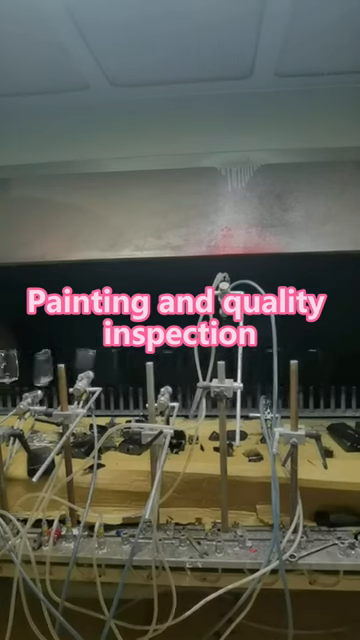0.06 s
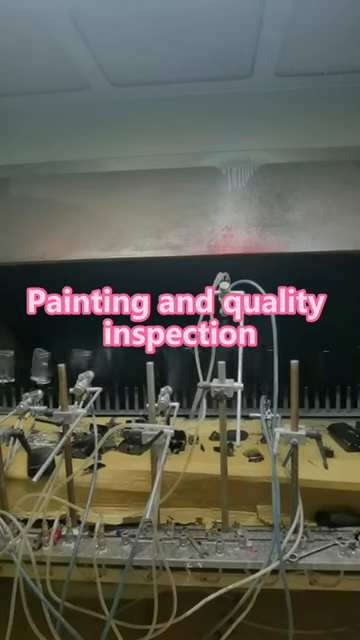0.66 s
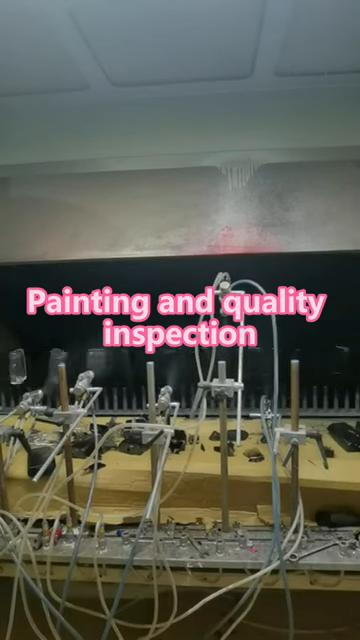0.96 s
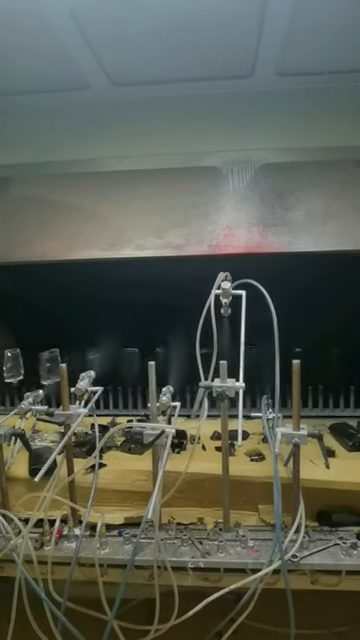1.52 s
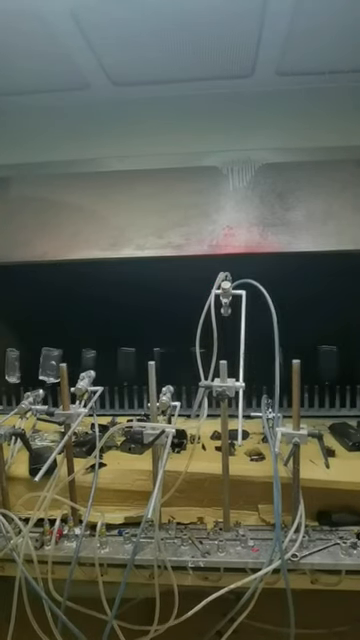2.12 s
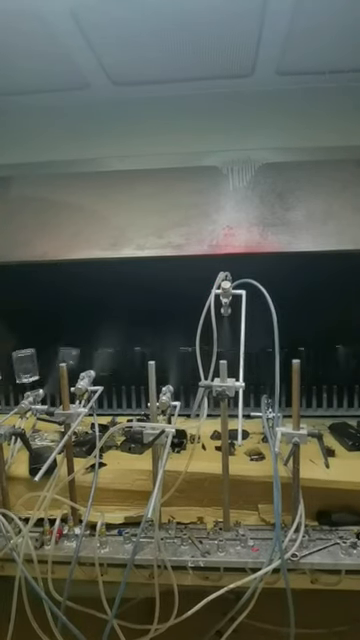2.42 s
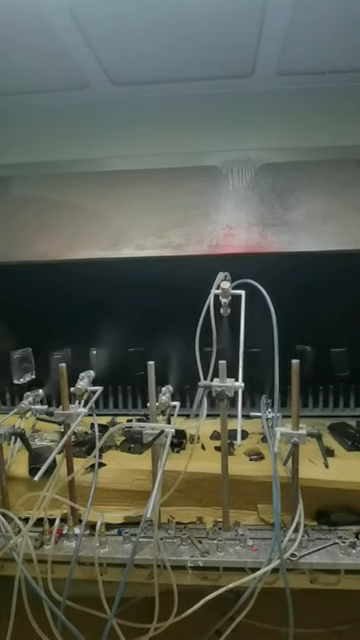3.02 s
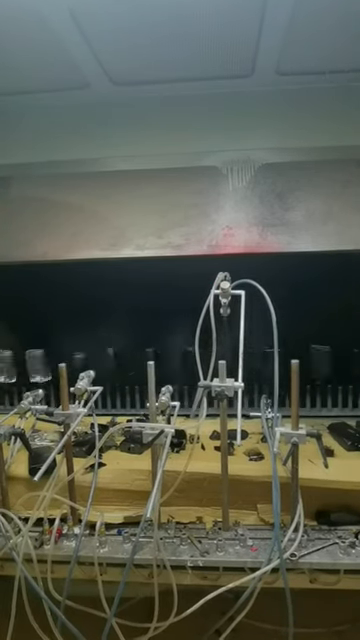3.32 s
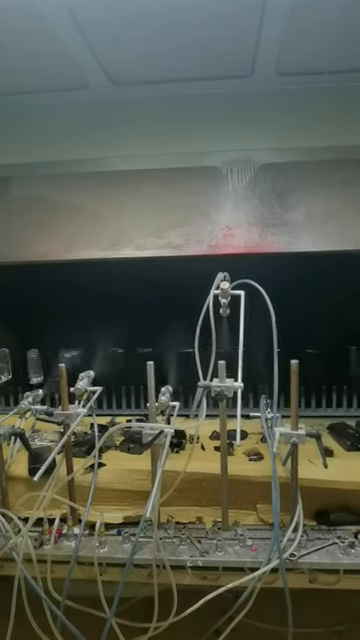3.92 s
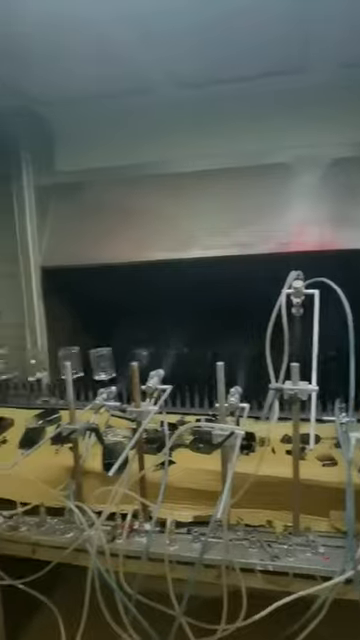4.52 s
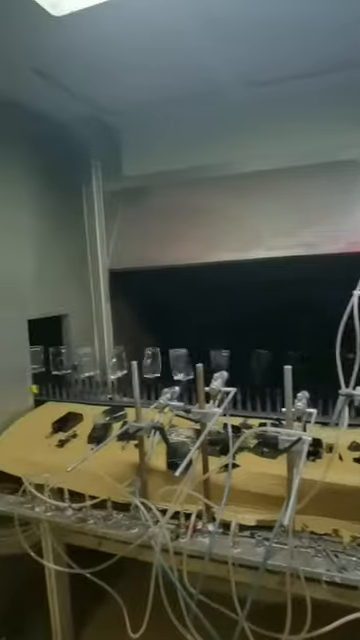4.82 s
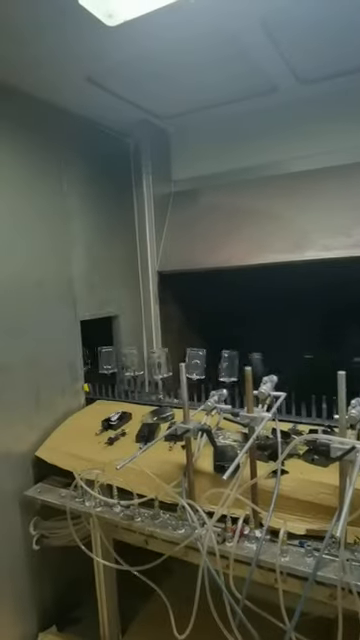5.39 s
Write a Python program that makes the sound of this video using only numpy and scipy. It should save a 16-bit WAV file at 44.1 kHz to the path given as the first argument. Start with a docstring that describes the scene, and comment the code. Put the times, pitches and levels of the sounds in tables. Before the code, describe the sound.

Automatic spray guns hiss in bright, repeating bursts with short pauses, over the low rumble of a paint booth extractor.

```python
"""Bright, hissing shots of air: automatic spray guns firing together, with a short pause every two thirds
of a second, heard from inside a paint booth. Each shot opens with a spit into the air jet; the paint
follows with a lower, flickering rasp and a hollow rush near the end. Air keeps bleeding in the pauses and
the extractor rumbles behind, with a few dull bumps and a knock. At first a low roar swells with each shot
over a deep hum; both are gone after nearly two seconds."""
import sys
import numpy as np
from scipy import signal
from scipy.fft import rfft, irfft
from scipy.io import wavfile

SR = 44100
rng = np.random.default_rng(int(sys.argv[2]) if len(sys.argv) > 2 else 0)


def int16_out(signal):
    """Quantize to a 16-bit WAV file."""
    q = np.round(np.clip(np.atleast_2d(signal).T, -1, 1) * 32767)
    wavfile.write(sys.argv[1], SR, q.astype(np.int16))


N = 244755
TIME = np.arange(N) / SR

# shots of the guns: (valve opens [s], valve shuts [s], strength [dB])
SHOTS = [(-.3, 0.117, -20), (0.186, 0.789, -20), (0.887, 1.453, -20.5), (1.527, 2.103, -21.5),
         (2.188, 2.764, -21), (2.848, 3.411, -21), (3.51, 4.099, -21.5), (4.19, 4.754, -21.5),
         (4.856, 5.433, -21.5), (5.511, 5.897, -22)]


def from_db(db):
    """Decibels to gain."""
    return 10 ** (np.asarray(db) / 20)


def held(until_s, release_s):
    """Full level, then a straight fall to nothing."""
    return np.clip(1 - (TIME - until_s) / release_s, 0, 1)


def struck(start_s, rise_s, decay_s):
    """A quick rise, then an exponential fall."""
    age = np.maximum(TIME - start_s, 0)
    return np.minimum(age / rise_s, 1) * np.exp(-np.minimum(age / decay_s, 20))


def drift(rate, size=8192):
    """A smooth random curve with spread 1 that changes about `rate` times a second."""
    hz = np.fft.rfftfreq(size, N / SR / size)
    slow = irfft(rfft(rng.standard_normal(size)) / (1 + (hz / rate) ** 2), size)
    return np.interp(np.linspace(0, size - 1, N), np.arange(size), slow / slow.std())


def turbulence(spectrum, flicker_db, flicker_hz, per_octave=2):
    """Coloured noise of rms 1 whose bands flicker on their own, sagging more than they swell."""
    hz = np.maximum(np.fft.rfftfreq(N, 1 / SR), 1)
    points_hz, points_db = np.transpose(spectrum)
    colour = from_db(np.interp(np.log(hz), np.log(points_hz), points_db))
    bins = rfft(rng.standard_normal(N)) * colour
    band = np.floor(per_octave * np.log2(np.clip(hz, points_hz[0], points_hz[-1])))
    noise = 0
    for k in np.unique(band):
        sag_db = flicker_db * np.logaddexp(0, 2 * drift(flicker_hz))
        noise = noise + irfft(bins * (band == k), N) * from_db(-sag_db)
    return noise / noise.std()


def resonant_noise(hz, width_hz):
    """Noise ringing in one resonance, rms 1."""
    broad = signal.lfilter(*signal.iirpeak(hz, 1, fs=SR), rng.standard_normal(N))
    ring = signal.lfilter(*signal.iirpeak(hz, hz / width_hz, fs=SR), broad)
    return ring / ring.std()


def valve(snap_share, snap_s, build_s, lead_s, fall_s):
    """Flow through a valve: part comes with the snap, the rest as pressure builds; it tapers at the end."""
    flow = 0
    for start, stop, db in SHOTS:
        snap = np.clip((TIME - start) / snap_s, 0, 1)
        build = np.clip((TIME - start) / build_s, 0, 1)
        rise = snap_share * snap + (1 - snap_share) * build
        flow = flow + from_db(db) * rise * held(stop - lead_s, fall_s)
    return flow


def booth(level, t60_s, direct_share):
    """Level of a hiss at the microphone: part comes straight, the rest lingers between the walls."""
    retained = from_db(-120 / (t60_s * SR))   # power falls 60 dB in t60_s
    power = level ** 2 + 1e-18
    stored, _ = signal.lfilter([1 - retained], [1, -retained], power, zi=[power[0]])
    return np.sqrt(direct_share * power + (1 - direct_share) * stored)


def extractor():
    """Air rumbles and rings in the ducts; it sounds boxier as the microphone turns to the side wall."""
    # rumble of the moving air: (frequency [Hz], relative density [dB])
    rumble_spectrum = [(15, -56), (30, -44), (45, -36), (60, -16), (85, -6), (110, -2.5), (150, 0.5),
                       (200, -4.5), (300, -3), (430, -19), (560, -22), (3000, -65)]
    # duct resonances: (frequency [Hz], width [Hz], level against the rumble [dB])
    duct_modes = [(150.7, 17, -8.5), (195, 10, -12), (258, 24, -14.5), (403.6, 28, -9.5), (474, 33, -15.5),
                  (643, 36, -23)]
    ducts = sum(from_db(db) * resonant_noise(hz, width) for hz, width, db in duct_modes)
    level = from_db(-49 + 1.1 * drift(8))
    turn_start_s, turn_length_s = 4.44, 0.63
    turned = np.clip((TIME - turn_start_s) / turn_length_s, 0, 1)
    wall = from_db(-53.5) * turned * resonant_noise(290, width_hz=120)
    return level * (turbulence(rumble_spectrum, flicker_db=4, flicker_hz=5.1) + ducts) + wall


def hum():
    """One deep tone wavers and throbs, with low noise around it; it holds, then stops."""
    # noise around the tone: (frequency [Hz], relative density [dB])
    noise_spectrum = [(20, -29), (35, -16), (50, 3), (65, -1), (95, 15), (140, -4), (300, -11)]
    pitch_hz = 46.3 + 0.5 * drift(3.1)
    tone = np.sqrt(2) * np.sin(2 * np.pi * np.cumsum(pitch_hz) / SR)
    throb = from_db(2 * drift(7))
    noise = from_db(-10.5) * turbulence(noise_spectrum, flicker_db=5, flicker_hz=5.2)
    return from_db(-52.5) * held(until_s=1.74, release_s=0.12) * (tone * throb + noise)


def low_roar():
    """A low roar swells slowly behind each of the first shots, weaker every time."""
    # the roar: (frequency [Hz], relative density [dB])
    roar_spectrum = [(30, -30), (60, -25), (85, -1), (150, -0.5), (220, -4), (330, -3.5), (430, -4.5),
                     (560, -16.5), (1200, -26), (3000, -48)]
    lag_s, fade_db_per_s = 0.063, 6
    flow = valve(snap_share=0.092, snap_s=0.02, build_s=0.12, lead_s=0.081, fall_s=0.19)
    late_flow = np.interp(TIME - lag_s, TIME, flow)
    level = late_flow * from_db(-19.5 - fade_db_per_s * TIME) * held(until_s=1.81, release_s=0.1)
    return level * turbulence(roar_spectrum, flicker_db=4.5, flicker_hz=15)


def bumps():
    """Dull bumps on the paint line, each a soft swell in one broad, low resonance."""
    # bumps: (time [s], ring [Hz], width [Hz], level [dB], half length [s])
    swells = [(0.316, 217, 50, -38, 0.02), (1.383, 138, 70, -43.5, 0.048), (1.42, 290, 110, -48, 0.025),
              (4.018, 124, 50, -41.5, 0.017), (4.705, 390, 200, -43, 0.012)]
    return sum(from_db(db) * np.exp(-((TIME - at) / half_s) ** 2 / 2) * resonant_noise(hz, width)
               for at, hz, width, db, half_s in swells)


def knock():
    """A soft blow sets something hollow ringing briefly."""
    # modes of the hollow body: (frequency [Hz], relative level [dB], time to fall 60 dB [s])
    modes = [(437, 1.5, 0.11), (388, -11, .09), (654, -12, 0.11)]
    start_s = 4.716
    ring = 0
    for hz, db, t60 in modes:
        level = from_db(-31 + db) * struck(start_s, rise_s=0.016, decay_s=t60 / np.log(1000))
        ring = ring + level * np.sin(2 * np.pi * hz * (TIME - start_s))
    return ring


def bleed():
    """Air escapes all the time in a thin hiss, stronger at first and heard while the guns are shut."""
    # escaping air: (frequency [Hz], relative density [dB])
    hiss_spectrum = [(600, -35), (1400, -33), (2100, -28), (2800, -28.5), (4000, -29), (4600, -23.5),
                     (5700, -18), (7800, -16.5), (8500, -14.5), (9200, -16), (11000, -24), (11700, -31.5),
                     (14000, -35)]
    level = from_db(-41.3 + 9.5 * held(until_s=0, release_s=0.68))
    return level * turbulence(hiss_spectrum, flicker_db=2.5, flicker_hz=25, per_octave=4)


def valve_spits():
    """Each valve opens with a spit that clears the nozzle, and dribbles raggedly just after it shuts."""
    # spit at the nozzle: (frequency [Hz], relative density [dB])
    spit_spectrum = [(400, -16), (800, 1), (1500, -12), (2300, -23), (3000, -4), (4200, 1), (5200, 7),
                     (7000, 3)]
    level = 0
    for start, stop, db in SHOTS:
        lag_s = 0.022 * (1 + rng.random())
        opening = from_db(-13.5) * struck(start, rise_s=0.0016, decay_s=0.015)
        dribble = from_db(-28) * struck(stop + lag_s, rise_s=0.002, decay_s=0.018)
        level = level + from_db(db) * (opening + dribble)
    return level * turbulence(spit_spectrum, flicker_db=16, flicker_hz=17, per_octave=4)


def hollow_rushes():
    """Late in a shot the spray gives a short, hollow rush, as if it swept over a passing bottle."""
    # rushes: (time [s], level [dB])
    rushes = [(0.048, -33), (0.700, -34), (1.385, -36.5), (2.024, -34.5), (2.688, -34.5), (3.345, -35.5),
              (4.02, -33), (4.689, -36.5), (5.365, -39)]
    # their colour: (frequency [Hz], relative density [dB])
    rush_spectrum = [(300, -19), (650, -11.5), (1200, -7), (1600, -4), (2100, 2), (3500, -5), (5500, 10.5),
                     (8000, -33)]
    half_length_s = 0.015
    level = sum(from_db(db) * np.exp(-((TIME - at) / half_length_s) ** 2 / 2) for at, db in rushes)
    hollow = from_db(-16.5) * resonant_noise(1078, width_hz=150)
    return level * (turbulence(rush_spectrum, flicker_db=6, flicker_hz=11, per_octave=4) + hollow)


def swirling_bands():
    """Narrow bands of noise in the rasp wander in pitch and come and go in short, uneven spells."""
    # swirling bands: (centre [Hz], full level against the rasp [dB])
    bands = [(1580, -26.5), (2040, -18.5), (2400, -19.5), (2890, -13.5), (3230, -14.5), (3500, -12.5),
             (4170, -15.5), (4600, -10.5), (5130, -8)]
    width_hz, wander_share = 30, 0.018
    swirl = 0
    for hz, db in bands:
        phase = 2 * np.pi * np.cumsum(hz * (1 + wander_share * drift(3))) / SR
        band = drift(width_hz) * np.cos(phase) + drift(width_hz) * np.sin(phase)
        spells = np.clip(0.5 + drift(10), 0, 1)
        swirl = swirl + from_db(db) * spells * band
    return swirl


def thin_blips(count=1200, length_s=0.036, spread_db=1):
    """Brief, thin tones flicker at random pitches within the rasp; rms 1."""
    # strength of a blip by its pitch: (frequency [Hz], relative level [dB])
    blip_levels = [(1450, -10), (2050, -5.5), (2500, 0), (3400, 1), (4000, 1.5), (5000, 8)]
    points_hz, points_db = np.transpose(blip_levels)
    age = np.arange(int(length_s * SR)) / SR
    window = np.sin(np.pi * age / length_s) ** 2
    blips = np.zeros(N + SR)
    for when, pitch, weakness in rng.random((count, 3)):
        hz = points_hz[0] * (points_hz[-1] / points_hz[0]) ** pitch
        db = np.interp(hz, points_hz, points_db) - spread_db * weakness
        first = int(when * N)
        blips[first:first + len(age)] += from_db(db) * window * np.sin(2 * np.pi * hz * age)
    return blips[:N] / blips[:N].std()


def paint_rasp():
    """The paint needle lifts slowly and seats early; the rasp's upper middle flickers and dips briefly."""
    # rasp of the paint: (frequency [Hz], relative density [dB])
    rasp_spectrum = [(250, -39), (600, -14), (1200, -15), (1900, -11), (2400, -10.5), (3000, -60),
                     (4200, -64), (4900, -4), (5400, 3.5), (6200, 4), (7500, 0), (10000, -74), (14000, -47)]
    # flickering band in its upper middle: (frequency [Hz], relative density [dB])
    band_spectrum = [(1900, -54), (2600, -3), (3400, 0), (4000, 0), (4800, 9), (5600, -41)]
    flow = from_db(-11.5) * valve(snap_share=0.31, snap_s=0.007, build_s=0.13, lead_s=0.015, fall_s=0.039)
    level = booth(flow, t60_s=0.088, direct_share=0.44)
    surge = from_db(0.37 * drift(22))
    rasp = turbulence(rasp_spectrum, flicker_db=4.5, flicker_hz=20, per_octave=4)
    dips = from_db(-18 * np.clip(1.2 * drift(11) - 1.2, 0, 1))   # now and then, by up to 18 dB
    flickering_band = from_db(-11) * turbulence(band_spectrum, flicker_db=9, flicker_hz=13, per_octave=5)
    upper_middle = flickering_band + swirling_bands() + from_db(-9) * thin_blips()
    return level * surge * (rasp + dips * upper_middle)


def bare_jets():
    """Just before the paint arrives and again as it stops, the bare jet sizzles more brightly."""
    # air without paint: (frequency [Hz], relative density [dB])
    sizzle_spectrum = [(6000, -29), (9000, 9), (10200, 7), (11500, 2.5), (14000, 1.5)]
    moments_s = [at for start, stop, _ in SHOTS for at in (start + 0.043, stop - 0.018)]
    level = from_db(-24.5) * sum(np.exp(-((TIME - at) / 0.023) ** 2) for at in moments_s)
    return level * turbulence(sizzle_spectrum, flicker_db=2.5, flicker_hz=32)


def air_jets():
    """The valves snap open; eddies make the whole jet flutter quickly, and the air cap whistles faintly."""
    # the jet of air: (frequency [Hz], relative density [dB])
    jet_spectrum = [(500, -29.5), (1200, -60), (2100, -70), (3100, -65), (4000, -68), (5200, -11.5),
                    (6200, -4), (6900, -3.5), (8000, 2.5), (8550, 4.5), (9300, 1), (10000, 0),
                    (11100, -4.5), (11500, -9.5), (14000, -10.5)]
    flow = valve(snap_share=0.45, snap_s=0.005, build_s=0.052, lead_s=0.015, fall_s=0.049)
    level = booth(flow, t60_s=0.13, direct_share=0.083)
    flutter = from_db(0.13 * drift(140) + 0.053 * drift(14))
    whistle = from_db(-21.5) * resonant_noise(8260, width_hz=130)
    return level * flutter * (turbulence(jet_spectrum, flicker_db=1.03, flicker_hz=14) + whistle)


def scene():
    """The guns in front and the booth behind, at one microphone: both channels are the same."""
    guns = valve_spits() + air_jets() + bare_jets() + paint_rasp() + hollow_rushes() + bleed()
    mono = guns + extractor() + low_roar() + hum() + bumps() + knock()
    return np.array([mono, mono])


def record(dry):
    """The top of the treble is cut steeply."""
    cutoff_hz = 14030
    return signal.sosfilt(signal.ellip(12, 0.1, 90, cutoff_hz, fs=SR, output="sos"), dry)


dry = scene()
out = record(dry)
int16_out(out)
```